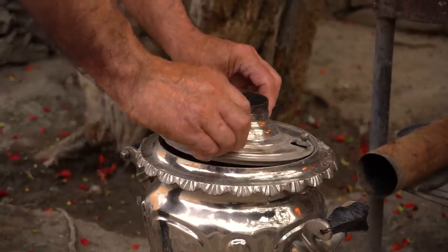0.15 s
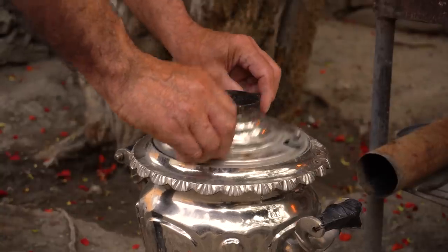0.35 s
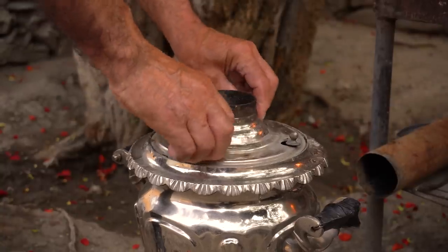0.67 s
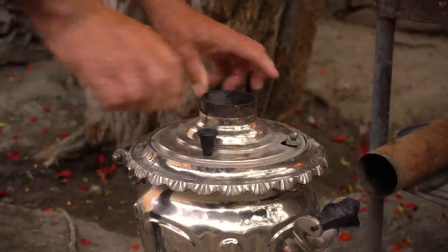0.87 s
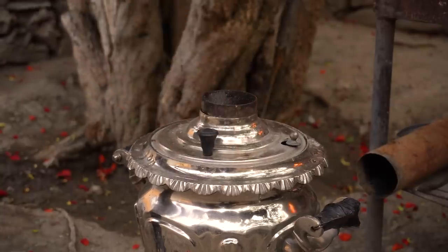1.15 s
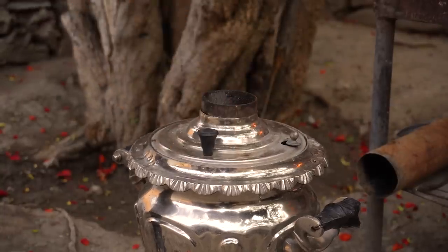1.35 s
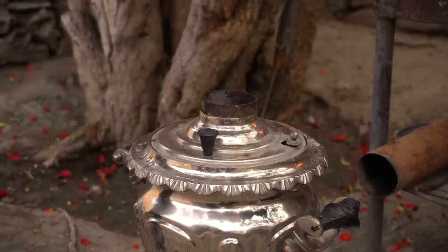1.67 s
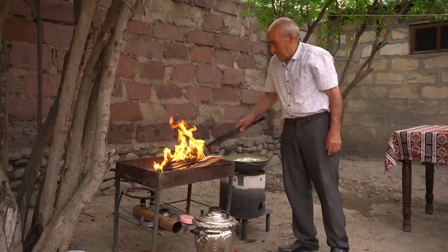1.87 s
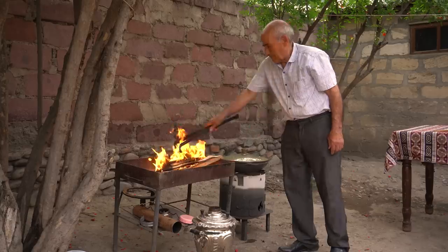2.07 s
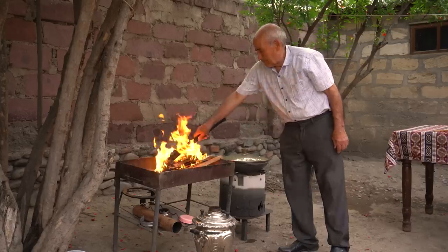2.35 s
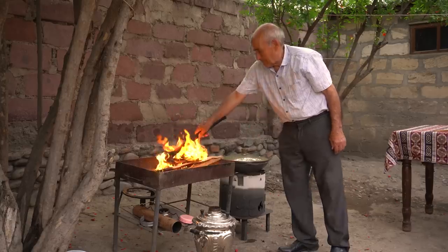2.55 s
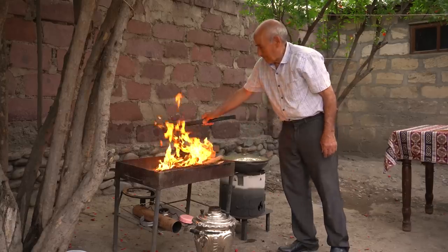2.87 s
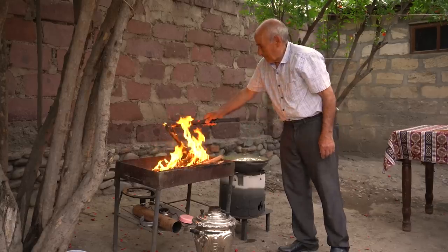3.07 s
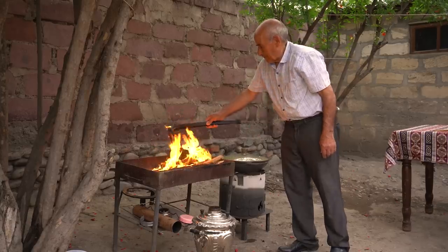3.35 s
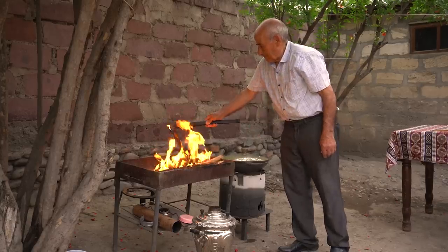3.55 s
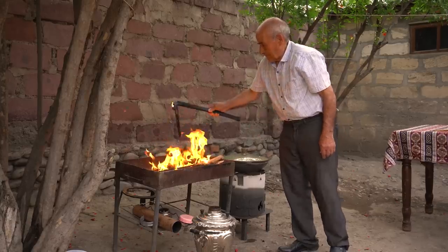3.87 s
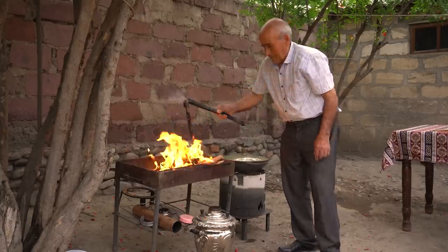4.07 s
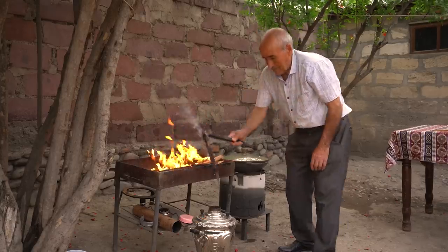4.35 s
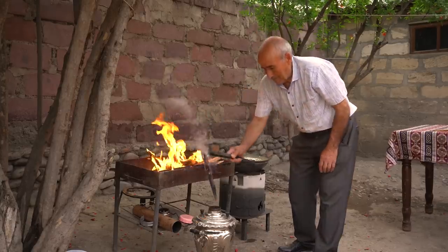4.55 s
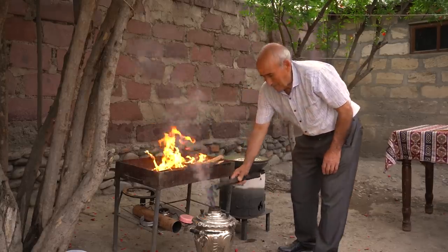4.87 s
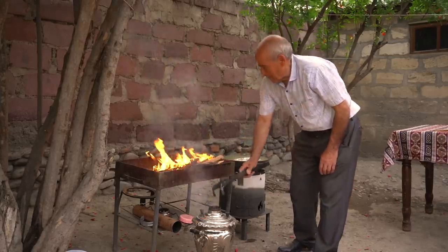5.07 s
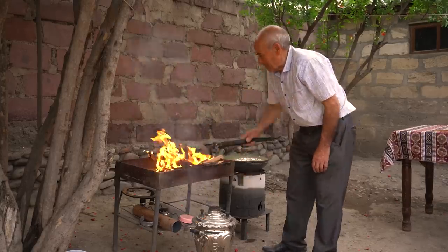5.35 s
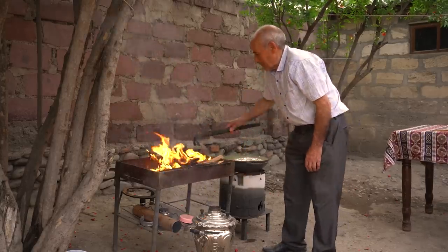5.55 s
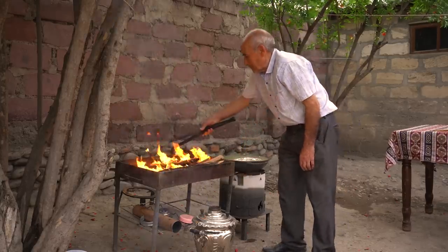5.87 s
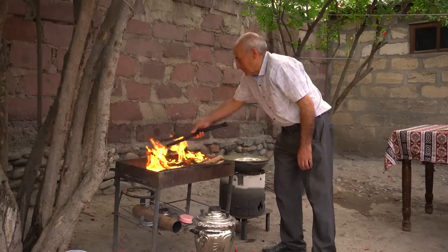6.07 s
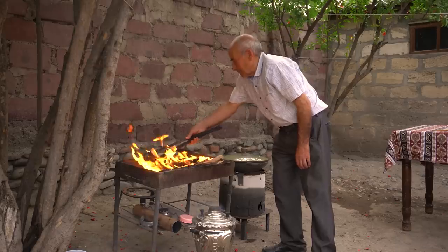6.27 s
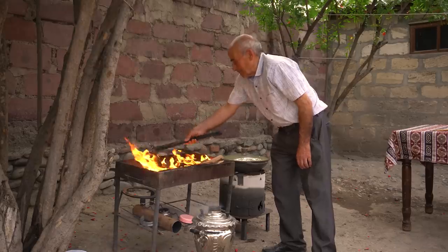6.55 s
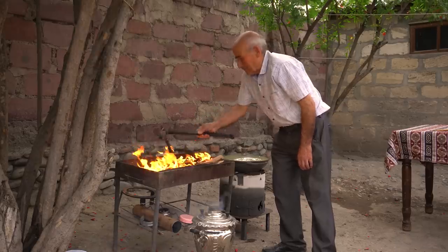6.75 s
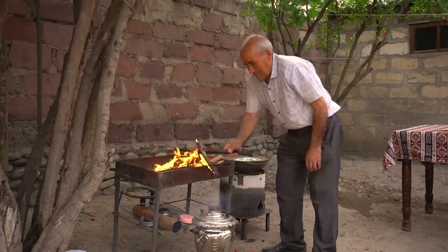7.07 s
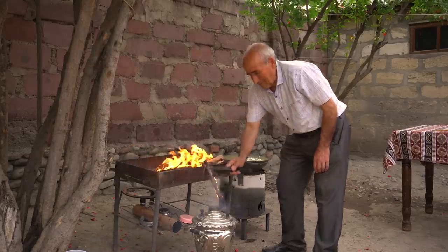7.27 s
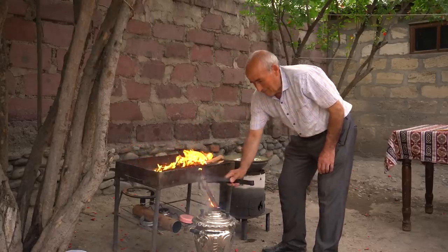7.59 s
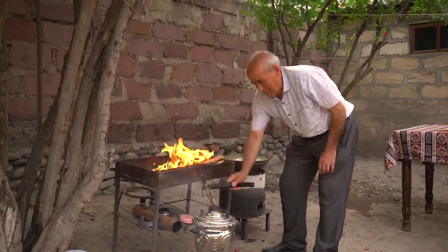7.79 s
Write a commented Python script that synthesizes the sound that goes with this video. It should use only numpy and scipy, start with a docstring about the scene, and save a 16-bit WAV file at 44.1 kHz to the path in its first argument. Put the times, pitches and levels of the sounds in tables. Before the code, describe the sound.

Outdoors in a walled yard, stereo. Close up, kindling crackles and sizzles in a metal urn's chimney while its lid lands with bright clanks, scrapes into place and taps. Then an open grill fire takes over: sharp, echoing log pops, some overloading the microphone, a hollow judder of a poker over wood, a ringing steel clang, small clinks and soft hissing sap. Thin bird chirps sit far off to the left.

```python
"""A walled yard, heard in stereo: first a metal tea urn close by, then an open steel grill.
Kindling cracks as split noise bursts in the urn's chimney; the lid rings as decaying modes and scrapes shut.
In the grill logs pop as noise snaps with echoes; a poker bangs on ringing steel and judders over the wood.
Birds are gliding tones in the trees; sizzle and air are shaped noise. The loudest peaks overload the input.
"""
import sys
import numpy as np
from scipy import signal
from scipy.fft import rfft, irfft, next_fast_len
from scipy.io import wavfile
from scipy.ndimage import uniform_filter1d

SR = 44100
rng = np.random.default_rng(int(sys.argv[2]) if len(sys.argv) > 2 else 0)


def wav_out(sig):
    """Save sig, one row per channel (or a flat mono array), as 16-bit PCM at SR to the path in sys.argv[1]."""
    wavfile.write(sys.argv[1], SR, np.round(np.clip(np.atleast_2d(sig).T, -1, 1) * 32767).astype(np.int16))


N = 349272
TIME = np.arange(N) / SR
TOP_HZ = 15900  # upper edge of the pass band
GRILL_FROM_S = 1.87  # the urn's fire is heard before this moment, the grill's after it

# Spectrum of the open air: hz, level_db
AIR_SPECTRUM = [(25, -30), (108, -12), (270, -10), (400, -3.5), (1400, -10), (3720, -14), (6210, -15.5),
                (8360, -24), (16000, -16.5)]
AIR_DB, FLARE_DB = -48.5, 7.5  # the flames flare up once when stirred, then settle
FLARE_S, FLARE_RISE_S, FLARE_FALL_S = 3.04, 1, 1.6

# Reverberation of the yard: hz, t60_s
YARD_DECAY = [(1200, 0.51), (3700, 0.46), (10000, 0.32)]

# Small birds in the trees: start_s, length_s, pitch_hz, glide (share of the pitch), level_db (relative)
BIRD_CALLS = [(1.991, 0.23, 5410, -0.07, -36.5), (2.23, 0.16, 6470, 0.025, -45),
              (3.161, 0.055, 5120, 0.13, -25.5), (4.595, 0.18, 5410, -.13, -37),
              (5.692, 0.088, 5750, .08, -38.5), (5.769, 0.089, 5060, 0.162, -32.5),
              (6.252, 0.11, 5940, -0.053, -42), (6.596, 0.082, 2970, -0.23, -44),
              (7.216, 0.13, 6370, 0, -48.5), (7.59, 0.12, 3390, -0.19, -49)]
BIRD_QUAVER_HZ = 190  # rms

# Sap vented by stirred logs: start_s, level_db (relative), t60_s
SAP_VENTS = [(2.34, -31, 5.6), (4.45, -47, 4.3), (5.06, -30.5, 1.4), (7.75, -35, 1.9)]
VENT_ATTACK_S = 0.018
URN_SIZZLE_DB, GRILL_SIZZLE_DB = -39, -54  # relative level of each fire's base sizzle

# Loudest cracks of kindling in the chimney, close by: start_s, level_db (relative)
CHIMNEY_CRACKS = [(.072,-23),(.284,-22.5),(.3708,-16.5),(0.844,-21),(.906,-23),(.952,-21),(.985,-17),(1.024,-16),(1.101,-23.5),(1.156,-20),(1.225,-19),(1.236,-19.5),(1.3742,-22),(1.503,-13.5),(1.5426,-19),(1.6005,-14),(1.618,-18),(1.77,-25.5)]
# Spectrum of a crack: hz, level_db
CRACK_SPECTRUM = [(100, -47), (600, -3.5), (1100, -11.5), (1900, 3.5), (2800, -1.5), (5000, 0), (10000, -3),
                  (16000, -2)]
CRACK_TILT_DB = 2  # brightness per octave above 1500 Hz
SMALL_CRACKS_PER_S, SMALL_CRACK_DB = 5, -27

# Blows of the lid on the urn: start_s, ring_db, clash_db, contact_s
LID_BLOWS = [(.4485, -11.5, 1, 0.00012), (.459, -6, 6.5, 0.00012), (.674, -14.5, -17, 0.0017),
             (.7635, -5, -17.5, 0.00083), (1.0735, -9, -41, 0.0088)]
# Modes of urn and lid: hz, level_db, t60_s
URN_MODES = [(479, -1, 0.099), (547, -0.5, 0.088), (636, -12, 0.16), (751, -3.5, 0.14), (825.5, -5, 0.2),
             (1202, 3, 0.067), (1300, 4.5, 0.049), (2050, -9, 0.085), (2900, -15, 0.09), (3194, -15, .23),
             (3510, -11.5, 0.21), (4010, -15, 0.29), (5990, -8, 0.2)]
# Spectrum of the lid's clash: hz, level_db
LID_CLASH_SPECTRUM = [(60, -31), (300, -12), (650, 5), (950, -10), (1300, 1), (1750, -6.5), (2600, -1),
                      (6000, -5.5), (9000, -9), (16000, -13)]
# The lid's rim scrapes into its seat
RIM_START_S, RIM_LENGTH_S, RIM_DB, RIM_CONTACT_S = .5, .13, -29, 0.012

# Burning wood settling: start_s, level_db (relative), pitch_hz
WOOD_KNOCKS = [(1.327, -37, 312), (2.591, -29.5, 510), (2.63, -33, 930), (2.802, -32.5, 514),
               (2.975, -36.5, 650), (4.252, -31, 222), (5.644, -45, 413)]
# Modes of a log under the poker: multiple of the pitch, level_db, t60_s
LOG_MODES = [(.701, -8, 0.029), (.93, -1.5, 0.02), (1.06, -1, 0.013)]
LOOSE_RING = 3  # a loose log rings this many times longer than one under the poker
# Spectrum of crunching charred wood: hz, level_db
CHAR_SPECTRUM = [(150, -31.5), (500, -4.5), (1000, -1.5), (1600, -0.5), (3500, -12.5), (8000, -29)]

# Clinks of the poker's tip on metal: start_s, level_db, pitch_hz
TIP_CLINKS = [(5.06, -20.5, 4110), (5.072, -22.5, 4570), (5.1275, -25, 3880), (5.1373, -23, 4370),
              (5.185, -24, 3710), (5.203, -21, 6387), (5.27, -29.5, 2670), (7.466, -33, 3520)]
# Modes of the poker: multiple of the pitch, level_db, t60_s
POKER_MODES = [(.74, -13, 0.023), (.95, -7, 0.034), (1.04, 1.5, 0.025), (1.55, -5, 0.03), (2.03, 1, 0.016)]

# Judders of the poker along the logs: start_s (first catch), length_s, level_db (relative), pitch_hz,
# slip_s (time between slips)
JUDDERS = [(2.229, 0.045, -25.5, 1226, 0.023), (2.382, 0.034, -25, 994, .021),
           (3.924, 0.1, -14.5, 1125, 0.026), (4.327, 0.069, -13.5, 1230, 0.017),
           (4.597, 0.031, -21.5, 1190, .028), (5.243, 0.067, -14, 1005, 0.029)]
SLIP_FADE_DB, SLIP_SAG = -7.5, 0.094  # change of level and lost share of pitch over a full judder
DRAG_S, DRAG_DB = 0.034, -29  # rubbing that builds up before each slip
CHAR_DB, CHAR_T60_S = -11.5, 0.041  # crunch of charred wood at each slip

# Poker blows on the grill: start_s, ring_db, clash_db, contact_s
GRILL_BLOWS = [(3.4445, -29, -5.5, 0.00012), (3.473, -44.5, -2, 0.00027), (3.59, -27.5, 4.5, .0001),
               (3.661, -10, -18.5, 0.002)]
# Modes of the steel grill: hz, level_db, t60_s
GRILL_MODES = [(325, -9, .3), (519, 0.5, .9), (678, -6, .42), (797, -4, .35), (856, -1, .45), (904, 4, .68),
               (1120, -3, .41), (1499, 5, .5), (1895, 4, .35), (2536, 7, .35), (3354, 6, .35),
               (3844, 6, .35), (4360, 7, .35), (5652, 8, .3)]
# Spectrum of the poker's clash: hz, level_db
POKER_CLASH_SPECTRUM = [(100, -26.5), (500, -10.5), (1100, -10.5), (1500, -2.5), (3000, 0.5), (6200, 1),
                        (7200, -15.5), (16000, -24)]
WOBBLES_PER_S, LID_WOBBLE, GRILL_WOBBLE = 55, .08, .25  # drift points per second; depth for each metal

# Loudest pops of the logs: start_s, level_db (relative), tilt_db (per octave above 1500 Hz), echo_db;
# those deep in the fire box are more echo
GRILL_POPS = [(1.899,-20.5,0.6,-0.5),(2.1882,-28.5,-2.5,1),(2.5042,-7,4.5,-6),(2.558,-6,4,-13),(2.7695,-5.5,16,-8.5),(2.8432,-14.5,3,1.5),(2.8501,-7.5,6.5,-3),(2.8938,-10.5,2,-12),(3.1007,-6,4,-4.5),(3.273,-7,6,-5.5),(3.379,11,4,-8),(3.4434,9.5,1.5,-4),(3.5564,-8,-0.5,-8),(4.1678,-21,4,-6),(4.189,-5.5,2,-7),(4.2649,-21,1,-0.5),(4.4275,-18.5,-1.5,-8.5),(4.4798,-3,10,-6),(4.55,-12,7.5,-3.5),(4.5968,-4.5,6,-9),(4.71,-20,4.5,-4),(6.501,-5.5,5,1),(6.719,-31,-1.5,-10),(6.8173,8,3,-6),(7.078,-30,3.5,4.5),(7.7371,-27.5,2,-5),(7.78,-22.5,7,3),(7.8181,-15,13,0.5)]
# Spectrum shared by pops, sizzle and tip ticks: hz, level_db
POP_SPECTRUM = [(60, -24), (350, -15), (800, -0.5), (1200, -4.5), (2500, -2), (5500, -1.5), (9500, -2.5),
                (11000, -5), (16000, -9.5)]
SMALL_POPS_PER_S, SMALL_POP_DB, SMALL_POP_TILT_DB, SMALL_POP_ECHO_DB = 4, -40.5, 4, -12
SNAP_T60_S, RATTLE_T60_S = .0055, 0.12
RATTLE_DB = -0.5  # rattle in the fire box relative to the pop's echo
GRIT_DB = 2.5  # unevenness of the rattle as the fibres tear one after another


def undb(db):
    """Decibels to gain."""
    return 10 ** (np.asarray(db) / 20)


def unit(x):
    """Scale to rms 1."""
    return x / np.sqrt(np.mean(x ** 2))


def curve(rows):
    """Join (s, value) rows with straight lines."""
    return np.interp(TIME, *np.transpose(rows))


def fade(t, t60):
    """Exponential decay, down 60 dB after t60 seconds."""
    return np.exp(-np.log(1000) * t / max(t60, 1e-4))


def add(track, s, sound):
    """Mix a sound into a track at time s."""
    i = max(int(s * SR), 0)
    track[..., i:i + sound.shape[-1]] += sound[..., :N - i]


def colour(x, points, tilt_db=0):
    """Minimum-phase filter from (Hz, dB) points and a treble tilt; keeps the power of white noise."""
    size = 1024
    octave = np.log2(np.maximum(np.fft.rfftfreq(size, 1 / SR), 1))
    hz, db = np.transpose(points)
    tilt = tilt_db * np.maximum(octave - np.log2(1500), 0)
    gain = undb(np.interp(octave, np.log2(hz), db) + tilt)
    audible = gain[octave < np.log2(TOP_HZ)]
    cepstrum = irfft(np.log(gain / np.sqrt(np.mean(audible ** 2))))
    # folding the cepstrum makes the filter causal
    cepstrum[1:size // 2] *= 2
    cepstrum[size // 2 + 1:] = 0
    response = irfft(np.exp(rfft(cepstrum)))
    return signal.fftconvolve(x, response[None], axes=-1)[:, :x.shape[-1]]


def noise(size, likeness):
    """Two channels of white noise with a given correlation."""
    own = rng.standard_normal((3, size))
    share = np.clip(likeness, 0, 1)
    return np.sqrt(share) * own[2] + np.sqrt(1 - share) * own[:2]


def pan(db):
    """Gains for a left-minus-right level."""
    return undb(np.array([[db], [-db]]) / 2)


def walk(rate, size=N):
    """Random drift joining normally distributed points, rate of them per second."""
    knots = rng.standard_normal(int(size / SR * rate) + 2)
    return np.interp(TIME[:size] * rate, np.arange(len(knots)), knots)


def stray_events(start_s, end_s, per_s, db, spread_db=3):
    """Rows (s, level dB) of small events at random moments."""
    length = end_s - start_s
    chance = rng.random((int(length * per_s), 2))
    return [(start_s + when * length, db + spread_db * (2 * size - 1)) for when, size in chance]


def ring(modes, t, contact_s=0, wobble=0):
    """Decaying modes; longer contact weakens the high ones, and loose metal wavers in level and phase."""
    out = 0
    for k, (hz, db, t60) in enumerate(modes):
        swell = wobble * walk(WOBBLES_PER_S, size=len(t))
        sway = wobble * walk(WOBBLES_PER_S, size=len(t))
        gain = (-1) ** k * undb(db) / (1 + (hz * contact_s / 2) ** 2)
        out = out + gain * fade(t, t60) * (1 + swell) * np.sin(2 * np.pi * hz * t + sway)
    return out


def yard_response():
    """Scattered echoes from ground and stone walls; the treble dies first, the bass is alike in both ears."""
    t = TIME[:int(.7 * SR)]
    hz = np.fft.rfftfreq(len(t), 1 / SR)
    mid, side = rfft(rng.standard_normal((2, len(t))))
    width = 0.99 * hz / (hz + 900)
    spectrum = (mid + np.array([[1], [-1]]) * width * side) / np.sqrt(1 + width ** 2)
    centres, t60s = np.transpose(YARD_DECAY)
    tail = 0
    for share, t60 in zip(np.eye(len(centres)), t60s):
        band = irfft(spectrum * np.interp(hz, centres, share), len(t))
        tail = tail + band * fade(t, t60)
    tail = tail * np.minimum(t / 0.0019, 1)
    return unit(tail) / np.sqrt(len(t))


def echo(x, response):
    """What the surroundings send back to the microphone."""
    mono = x.sum(axis=0, keepdims=True) / np.sqrt(3)
    return signal.fftconvolve(mono, response, axes=-1)[:, :N]


def flare():
    """Height of the flames' flare-up, 0 to 1."""
    return curve([(FLARE_S - FLARE_RISE_S, 0), (FLARE_S, 1), (FLARE_S + FLARE_FALL_S, 0)])


def air():
    """A soft outdoor wash; the flames make each region of pitch flutter on its own."""
    spectrum = rfft(unit(colour(noise(N, likeness=0.68), AIR_SPECTRUM)), next_fast_len(N))
    hz = np.linspace(0, SR / 2, spectrum.shape[1])
    centres = np.geomspace(100, 12800, 15)
    wash = 0
    for share in np.eye(len(centres)):
        band = irfft(spectrum * np.interp(hz, centres, share))[:, :N]
        wash = wash + band * undb(2.2 * walk(rate=30))
    return unit(wash) * undb(AIR_DB + FLARE_DB * flare())


def birds():
    """Thin, buzzy gliding whistles that flutter in level."""
    out = np.zeros((2, N))
    for s, length, pitch, glide, db in BIRD_CALLS:
        size = int(length * SR)
        quaver = unit(uniform_filter1d(rng.standard_normal(size), size=40))
        hz = pitch * (1 + glide * np.linspace(-.5, .5, size)) + BIRD_QUAVER_HZ * quaver
        flutter = undb(4 * walk(rate=60, size=size))
        swell = np.sin(np.linspace(0, np.pi, size))
        whistle = np.sin(2 * np.pi * np.cumsum(hz) / SR)
        add(out, s, undb(db) * flutter * swell * whistle)
    return out


def steam_flow():
    """Each fire has a constant base flow; a vent of sap opens quickly and dies away."""
    flow = undb(np.where(TIME < GRILL_FROM_S, URN_SIZZLE_DB, GRILL_SIZZLE_DB))
    for s, db, t60 in SAP_VENTS:
        age = np.maximum(TIME - s, 0)
        vent = undb(db) * np.minimum(age / VENT_ATTACK_S, 1) * fade(age, t60)
        flow = np.hypot(flow, vent)
    return flow


def sizzle(yard):
    """Countless tiny bursts over a thin jet of steam."""
    burst_gain = undb(np.minimum(8.1 * rng.exponential(size=N), 19))
    ticks = (rng.random(N) < 130 / SR) * burst_gain  # about 130 a second
    bursts = signal.fftconvolve(ticks, fade(TIME[:SR // 50], 0.032))[:N]
    grains = noise(N, likeness=0.23) * bursts
    sputter = undb(2.5 * walk(rate=11))
    steam = noise(N, likeness=0.63) * undb(2 * walk(rate=45))
    hiss = colour(0.65 * unit(grains) + 0.43 * steam, POP_SPECTRUM, tilt_db=3.0)
    sound = hiss * steam_flow() * sputter
    return sound + undb(-18) * echo(sound, yard)


def draught(hz, width_hz, db, until_s):
    """Hot air hums hollowly in the urn's chimney: noise through one resonance, fading from the start."""
    pipe = signal.lfilter(*signal.iirpeak(hz, hz / width_hz, fs=SR), noise(N, likeness=0.92))
    return undb(db) * unit(pipe) * np.clip(1 - TIME / until_s, 0, 1)


def settling_wood():
    """Burning wood shifts and drops with a dull knock and a little crunch."""
    out, t = np.zeros((2, N)), TIME[:SR // 5]
    for s, db, hz in WOOD_KNOCKS:
        modes = [(hz * k, mode_db, t60 * LOOSE_RING) for k, mode_db, t60 in LOG_MODES]
        crunch = colour(noise(len(t), likeness=0.77) * fade(t, 0.065), CHAR_SPECTRUM)
        add(out, s, undb(db) * (ring(modes, t) + undb(1.0) * crunch))
    return out


def chimney(yard):
    """Each crack of kindling splits twice in quick succession and rattles briefly in the pipe."""
    out, t = np.zeros((2, N)), TIME[:SR // 10]
    small = stray_events(0, GRILL_FROM_S, SMALL_CRACKS_PER_S, SMALL_CRACK_DB)
    for s, db in CHIMNEY_CRACKS + small:
        late = t - rng.uniform(0.0016, 0.015)
        second_split = .5 * (late > 0) * fade(abs(late), 0.013)
        shape = fade(t, 0.0026) + 0.82 * fade(t, 0.041) + second_split
        crack = colour(noise(len(t), likeness=0.35) * shape, CRACK_SPECTRUM, CRACK_TILT_DB)
        add(out, s, undb(db) * crack)
    return pan(db=-6) * (undb(3.5) * out + undb(-4.5) * echo(out, yard))


def rim():
    """Tiny slips of the lid's rim keep the urn's modes ringing."""
    out, size = np.zeros((2, N)), int(RIM_LENGTH_S * SR)
    slips = rng.standard_normal(size) * (rng.random(size) < 900 / SR)  # about 900 a second
    sound = signal.fftconvolve(slips, ring(URN_MODES, TIME[:SR // 4], RIM_CONTACT_S))
    add(out, RIM_START_S, undb(RIM_DB) * sound / np.std(sound[:size]))
    return out


def metal(blows, modes, clash_colour, clash_t60, likeness, wobble):
    """Struck sheet metal: a noise clash of crowded modes, then the few long ones sing on unevenly."""
    out, t = np.zeros((2, N)), TIME[:SR]
    for s, ring_db, clash_db, contact_s in blows:
        clash = colour(noise(len(t), likeness) * fade(t, clash_t60), clash_colour)
        singing = ring(modes, t, contact_s, wobble) / 2
        add(out, s, undb(clash_db) * clash + undb(ring_db) * singing)
    return out


def poker_tip():
    """Each touch is a short gritty tick; its pitch depends on where the rod meets the rim."""
    out, t = np.zeros((2, N)), TIME[:SR // 5]
    for s, db, hz in TIP_CLINKS:
        modes = [(hz * k, mode_db + 3 * rng.standard_normal(), t60) for k, mode_db, t60 in POKER_MODES]
        tick = colour(noise(len(t), likeness=1.0) * fade(t, 0.022), POP_SPECTRUM, tilt_db=0.5)
        add(out, s, undb(db) * (tick + undb(-4.0) * ring(modes, t)))
    return out


def poker_on_wood():
    """The iron drags, sticks and slips; each slip knocks a hollow note out of a log, weaker and lower."""
    out, t = np.zeros((2, N)), TIME[:SR // 10]
    size = int(DRAG_S * SR)
    for s, length, db, hz, slip_s in JUDDERS:
        for delay in np.arange(0, length, slip_s):
            progress = delay / length
            pitch = hz * (1 - SLIP_SAG * progress)
            modes = [(pitch * k * (1 + 0.03 * rng.standard_normal()), mode_db, t60)
                     for k, mode_db, t60 in LOG_MODES]
            drag = undb(DRAG_DB) * rng.standard_normal(size) * np.linspace(0, 1, size)
            # the rubbing, then the slip's single impulse, drive the log's modes
            knock = signal.fftconvolve(np.append(drag, 1), ring(modes, t) * (1 - fade(t, 0.004)))
            crunch = colour(noise(len(t), likeness=1) * fade(t, CHAR_T60_S), CHAR_SPECTRUM)[0]
            add(knock, DRAG_S, undb(CHAR_DB) * crunch)
            uneven = 1 + 0.086 * rng.standard_normal()
            add(out, s + delay * uneven - DRAG_S, undb(db + SLIP_FADE_DB * progress) * knock)
    return out


def logs():
    """Steam pockets burst: a snap of milliseconds, a short rattle in the fire box, then the walls."""
    out, t = np.zeros((2, N)), TIME[:SR // 5]
    snap = unit(fade(t, SNAP_T60_S)) / np.sqrt(len(t))
    rattle = unit(fade(t, RATTLE_T60_S)) / np.sqrt(len(t))
    snap_gain = np.sqrt(.003 * SR)  # energy of 3 ms of noise
    strays = stray_events(GRILL_FROM_S, N / SR, SMALL_POPS_PER_S, SMALL_POP_DB)
    small = [(s, db, SMALL_POP_TILT_DB, SMALL_POP_ECHO_DB) for s, db in strays]
    for s, db, tilt_db, echo_db in GRILL_POPS + small:
        # every pop comes from another spot, so it has echoes of its own
        pop = undb(echo_db) * yard_response()
        tearing = unit(undb(GRIT_DB * walk(rate=800, size=len(t))))
        shape = snap + undb(echo_db + RATTLE_DB) * rattle * tearing
        add(pop, 0, noise(len(t), likeness=0.76) * shape)
        add(out, s, undb(db) * snap_gain * colour(pop, POP_SPECTRUM, tilt_db))
    return out


def scene():
    """Everything sounds in the same yard; the birds are far off, with more echo than direct sound."""
    yard = yard_response()
    lid = metal(LID_BLOWS, URN_MODES, LID_CLASH_SPECTRUM, clash_t60=0.1, likeness=0.82, wobble=LID_WOBBLE)
    lid = lid + rim()
    grill = metal(GRILL_BLOWS, GRILL_MODES, POKER_CLASH_SPECTRUM, clash_t60=0.3, likeness=0.51,
                  wobble=GRILL_WOBBLE)
    knocks, clinks, calls = poker_on_wood(), poker_tip(), birds()
    left_side = pan(db=13.5) * (knocks + undb(-6.0) * calls)
    near = lid + grill + clinks + settling_wood() + left_side
    to_walls = undb(-14.0) * lid + undb(-9.5) * grill + undb(1.0) * knocks + undb(-3.0) * clinks + calls
    fires = chimney(yard) + logs() + sizzle(yard)
    hum = draught(hz=750, width_hz=79, db=-43.5, until_s=1.73)
    return near + echo(to_walls, yard) + fires + air() + hum


def record(dry):
    """The microphone input flattens the loudest peaks towards full scale; the extreme treble is cut."""
    flattened = dry / (1 + dry ** 4) ** (1 / 4)
    return signal.sosfilt(signal.ellip(10, .2, 60, TOP_HZ, fs=SR, output="sos"), flattened)


dry = scene()
out = record(dry)
wav_out(out)
```